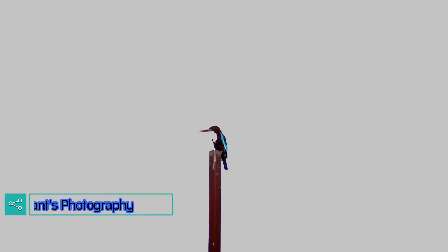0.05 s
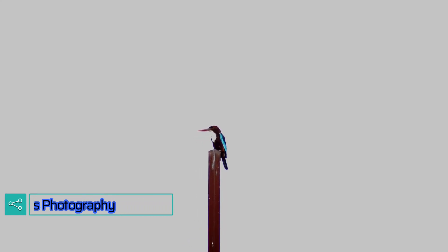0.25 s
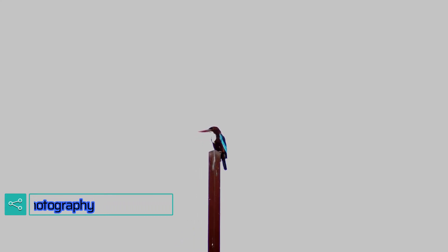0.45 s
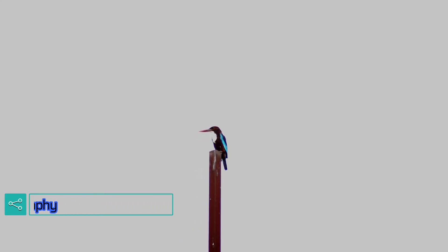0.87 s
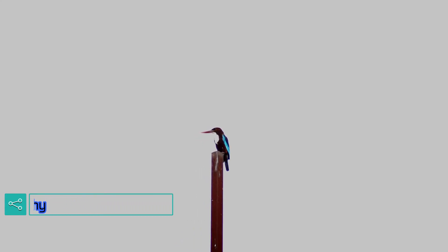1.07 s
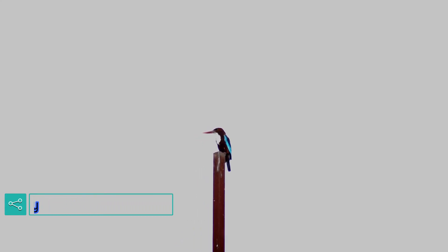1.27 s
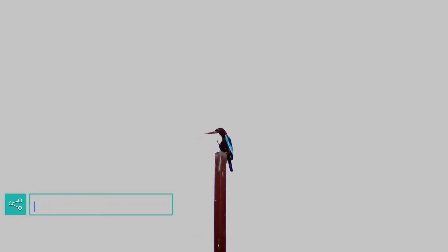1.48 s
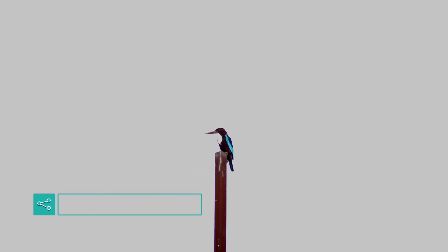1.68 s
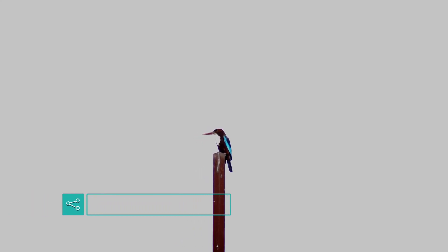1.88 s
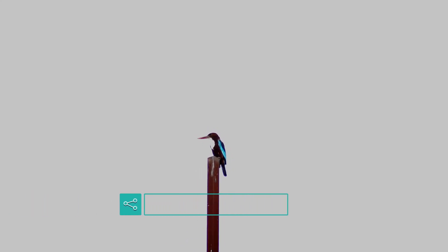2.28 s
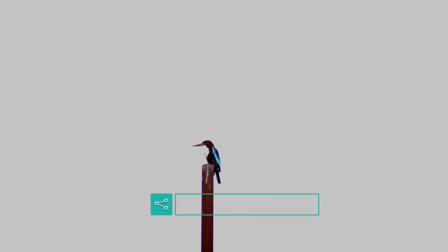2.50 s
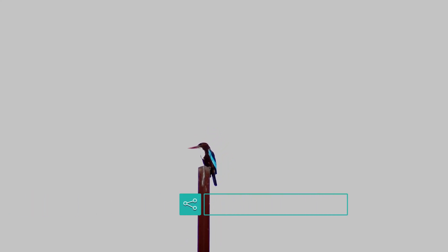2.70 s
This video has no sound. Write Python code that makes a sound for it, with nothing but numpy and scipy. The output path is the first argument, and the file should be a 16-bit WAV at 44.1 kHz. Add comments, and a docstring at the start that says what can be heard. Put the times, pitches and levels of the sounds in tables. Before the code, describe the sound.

A kingfisher on the left whistles a quick two-note call eight times, each with a short ringing echo. Steady outdoor rumble and hiss lie underneath, and a faint, distant bird adds one wavering whistle near the end.

```python
"""Steady outdoor rumble and hiss fade in, with the faint end of a bird's note at the very start.
A kingfisher to the left then whistles a quick two-note call eight times: a soft low slide, then a loud
high note that dives and flicks up to a held pitch. Nearby surfaces scatter each call into a ringing tail.
Around the last call a faint, far bird joins in with one wavering whistle, and the scene fades out."""
import sys
import numpy as np
from scipy import signal
from scipy.fft import rfft, irfft
from scipy.io import wavfile
from scipy.ndimage import uniform_filter1d

SR = 44100
rng = np.random.default_rng(int(sys.argv[2]) if len(sys.argv) > 2 else 0)


def pcm_store(signal):
    """Save signal as 16-bit PCM."""
    levels = np.round(np.clip(np.atleast_2d(signal), -1, 1) * 32767)
    wavfile.write(sys.argv[1], SR, levels.astype(np.int16).T)


N = 125685
TAIL_FADE_S, TAIL_BUILD_S = .72, .015  # the ringing tail: time to fall by 60 dB, time to build up


def gain(db):
    """Turn decibels into a number to multiply the sound by."""
    return 10 ** (np.asarray(db) / 20)


def wander(per_second):
    """Smooth random drift, about 1 in size, with a new target this many times a second."""
    step = max(int(SR / per_second), 1)
    targets = np.repeat(rng.standard_normal(N // step + 1), step)
    return 1.3 * uniform_filter1d(uniform_filter1d(targets, step), step)[:N]


def colour(sound, points):
    """Make some pitches louder and others softer, along a curve of (pitch_hz, level_db) points."""
    pitch_hz, level_db = np.array(points, float).T
    all_hz = np.maximum(np.fft.rfftfreq(N, 1 / SR), 1)
    curve_db = np.interp(np.log(all_hz), np.log(pitch_hz), level_db)
    return irfft(rfft(sound) * gain(curve_db), N)


def outdoors():
    """Distant rumble and fine hiss; the bass is alike left and right, the treble is spread wide."""
    # the mix of low and high in the rumble: pitch_hz, relative_db
    rumble_curve = [(15, -74.5), (25, -34), (43, -28), (151, -8.5), (257, -1.5), (359, -3), (523, -7),
                    (566, -4.5), (703, -6), (964, -3), (1580, -8.5), (1850, -9.5), (2540, -15.5),
                    (2800, -16), (3640, -43), (6160, -120)]
    # the mix of low and high in the hiss: pitch_hz, relative_db
    hiss_curve = [(2500, -22), (3000, 2.5), (5000, -3.5), (8000, -7), (11000, -10.5), (15500, -14.5)]
    # how much left and right differ, against what they share: pitch_hz, relative_db
    width_curve = [(60, -25), (125, -28), (250, -23.5), (500, -8), (1000, -5), (1600, 0), (2400, 2.5),
                   (4000, 3.5), (12000, -1.5)]

    def wide_noise(curve, level_db):
        shared, side = colour(rng.standard_normal((2, N)), curve)
        pair = shared + colour(side, width_curve) * np.array([[1], [-1]])
        return pair * gain(level_db) / np.std(pair)

    rumble = wide_noise(list(rumble_curve) + [(3300, -63)], level_db=-44)
    swell_db = .47 * wander(per_second=5)
    return rumble * gain(swell_db) + wide_noise(hiss_curve, level_db=-52)


def whistle(shape, dive_s, note_db, shift_hz, rasp=0):
    """One sliding, unsteady whistle in two rows: its main tone and its overtones (higher copies)."""
    t = np.arange(N) / SR - dive_s
    time_s, pitch_hz, level_db = np.array(shape, float).T
    waver = .006 + rasp * np.clip((-.016 - t) / .005, 0, 1)  # the rasp stops 16 ms before mid-dive
    pitch = (np.interp(t, time_s, pitch_hz) + shift_hz) * (1 + waver * wander(per_second=450))
    on_off = np.clip(np.minimum(t - time_s[0], time_s[-1] - t) / .002 + 1, 0, 1)
    flutter_db = 1.5 * wander(per_second=450)
    loudness = on_off * gain(note_db + np.interp(t, time_s, level_db) + flutter_db)
    phase = 2 * np.pi * np.cumsum(pitch) / SR
    overtones = gain(-33) * np.sin(2 * phase) + gain(-30) * np.sin(3 * phase)
    return loudness * np.array([np.sin(phase), overtones])


def kingfisher():
    """Each call is a low slide, then a high dive that starts raspy and jumps up to a held pitch."""
    # the low note, timed from the middle of its dive: time_s, pitch_hz, relative_db
    low_shape = [(-.036, 4450, -14), (-.024, 4230, -1), (-.020, 4050, -20), (-.014, 4350, -12),
                 (-.007, 4450, 1), (-.001, 4150, 1.5), (.004, 3830, -5.5), (.013, 3680, -5.5),
                 (.026, 3600, 2.5), (.037, 3620, -9), (.043, 3650, -23.5)]
    # the high note, timed from the middle of its dive: time_s, pitch_hz, relative_db
    high_shape = [(-.038, 5750, -19), (-.028, 5950, -11.5), (-.021, 6250, -14), (-.013, 6620, -11),
                  (-.004, 6520, -9), (.001, 6180, -1), (.006, 5620, -7), (.012, 5440, -13.5),
                  (.021, 5270, -1), (.028, 4950, -5), (.031, 4850, -29)]
    # the high note's held end, timed from that same dive: time_s, pitch_hz, relative_db
    hold_shape = [(.029, 5600, -21.5), (.034, 5780, -1.5), (.040, 5840, -1.5), (.048, 5890, -11.5),
                  (.054, 5800, -24)]
    # each low note: dive_s, level_db, shift_hz
    low_notes = [(.1832, -31.5, 0.5), (.4768, -30.5, -21), (.7663, -30, 5), (1.0571, -30.5, 7.5),
                 (1.3563, -29, 12), (1.6559, -31.5, 31.5), (1.9562, -30, -14), (2.2692, -31, 9.5)]
    # each high note and its held end: dive_s, level_db, shift_hz, hold_db, hold_shift_hz
    high_notes = [(-.024, -30.5, 5, -40, -53), (.2685, -27, 18.5, -24, -30), (.5593, -25.5, -20, -26, -21),
                  (.8521, -26.5, 30, -29, 29.5), (1.1455, -25, 1, -24, 22), (1.4463, -24, -3, -23.5, -69),
                  (1.7466, -24.5, 23, -26, 0.5), (2.0452, -24, 0, -27.5, 55),
                  (2.3597, -24.5, -24, -24, -110)]
    low = sum(whistle(low_shape, *note) for note in low_notes)
    high = np.zeros((2, N))
    for dive_s, level_db, shift_hz, hold_db, hold_shift_hz in high_notes:
        high += whistle(high_shape, dive_s, level_db, shift_hz, rasp=.035)
        high += whistle(hold_shape, dive_s, hold_db, hold_shift_hz)
    return high + low * gain([[0], [-10]])  # the low note has weaker overtones, so it sounds purer


def from_left(sound, delay_s=.000147):
    """A sound from the left reaches the right microphone a little later."""
    delay = np.exp(-2j * np.pi * np.fft.rfftfreq(N, 1 / SR) * delay_s)
    return np.array([sound, irfft(rfft(sound) * delay, N)])


def scatter(sound, level_db, fade_s, build_s):
    """Many tiny echoes, mostly from the left, blur into ringing that falls by 60 dB in fade_s."""
    t = np.arange(N) / SR
    shape = np.exp(-np.log(1000) * t / fade_s) * (1 - np.exp(-t / build_s))
    left_share = .6  # the rest of the energy comes from all around
    leftward = np.sqrt(left_share) * from_left(rng.standard_normal(N))
    all_around = np.sqrt(1 - left_share) * rng.standard_normal((2, N))
    tiny_echoes = gain(level_db) * (leftward + all_around) * shape / np.sqrt(np.sum(shape ** 2))
    return signal.fftconvolve(sound[None], tiny_echoes, axes=1)[:, :N]


def surroundings(sound):
    """The sound arrives directly, then off nearby surfaces: clear echoes, a short blur, a long tail."""
    # single bounces off nearby surfaces: delay_s, left_db, right_db
    echoes = [(.0022, -24.5, -1.5), (.009, -9.5, -6), (.018, -15.5, -12), (.038, -17, -17.5),
              (.062, -23, -20), (.152, -15, -17.5)]
    direct = from_left(sound)
    bounces = np.zeros((2, N))
    for delay_s, left_db, right_db in echoes:
        delayed = np.pad(direct, ((0, 0), (int(delay_s * SR), 0)))[:, :N]
        bounces += gain([[left_db], [right_db]]) * delayed
    blur = scatter(sound, level_db=-2.5, fade_s=.13, build_s=.002)
    tail = scatter(sound, level_db=-2, fade_s=TAIL_FADE_S, build_s=TAIL_BUILD_S)
    return direct + bounces + blur + tail


def far_bird():
    """A faint, wavering whistle that rises a little, heard only through its echoes."""
    # the far bird's one note: start_s, end_s, from_hz, to_hz, level_db
    far_note = (2.32, 3, 2849.5, 3024.5, -49.5)
    start_s, end_s, from_hz, to_hz, level_db = far_note
    t = np.arange(N) / SR
    pitch = np.interp(t, [start_s, end_s], [from_hz, to_hz]) * (1 + .025 * wander(per_second=60))
    on_off = np.clip(np.minimum(t - start_s, end_s - t) / .02, 0, 1)
    tone = on_off * np.sin(2 * np.pi * np.cumsum(pitch) / SR)
    return scatter(tone, level_db, TAIL_FADE_S, TAIL_BUILD_S)


def scene():
    """Two birds over outdoor noise; the kingfisher's overtones beam straight at the left microphone."""
    tone, overtones = kingfisher()
    calls = surroundings(tone + gain(-14) * overtones)
    beamed = from_left(overtones) * gain([[7.75], [-7.75]])  # left, right
    return calls + beamed + far_bird() + outdoors()


def record(dry):
    """The sound fades in and out, with a small lift at the very end; the highest treble is cut."""
    # the overall volume: time_s, gain
    fade = [(0, .01), (.13, .36), (.27, 1), (2.53, 1), (2.7, .42), (2.795, .005), (2.85, .11)]
    faded = dry * np.interp(np.arange(N) / SR, *np.array(fade).T)
    treble_cut = signal.ellip(10, .2, 70, 15700, fs=SR, output="sos")  # above 15700 Hz
    return signal.sosfilt(treble_cut, faded)


dry = scene()
out = record(dry)
pcm_store(out)
```